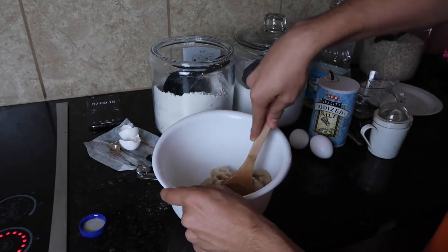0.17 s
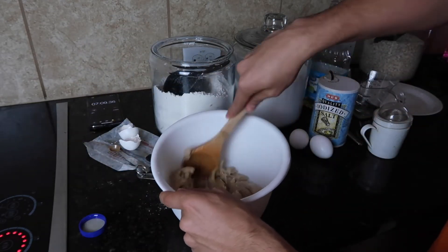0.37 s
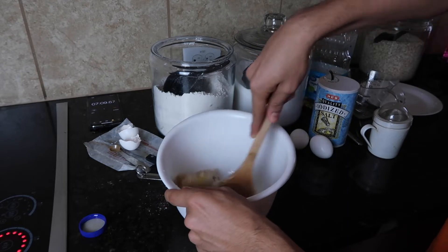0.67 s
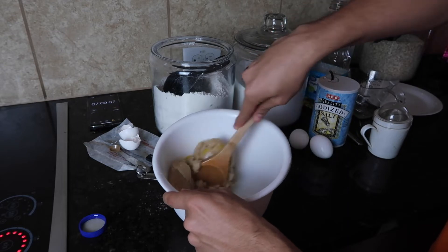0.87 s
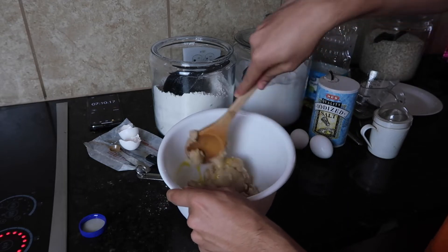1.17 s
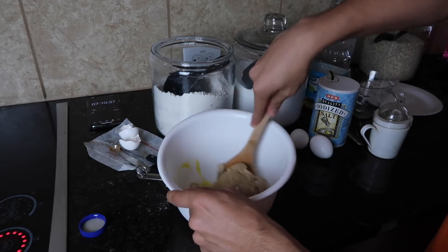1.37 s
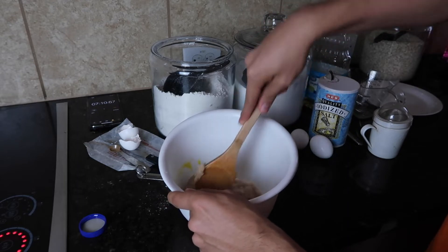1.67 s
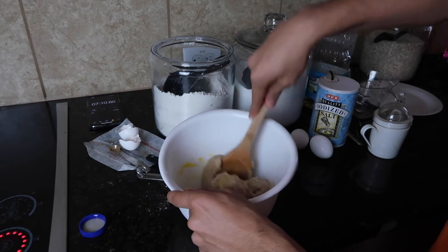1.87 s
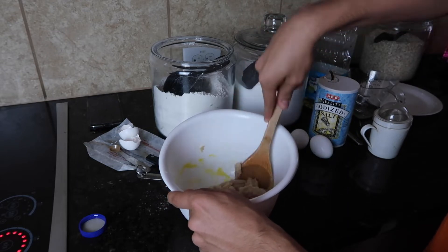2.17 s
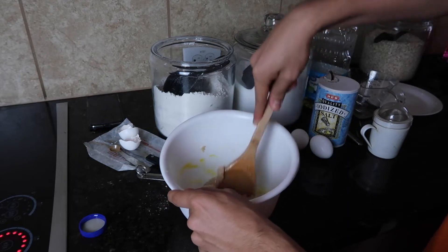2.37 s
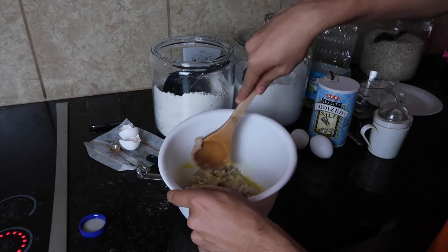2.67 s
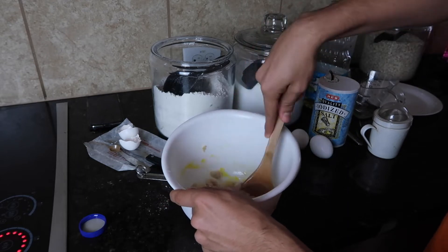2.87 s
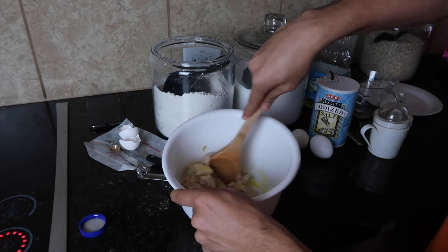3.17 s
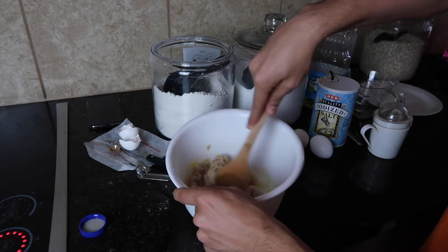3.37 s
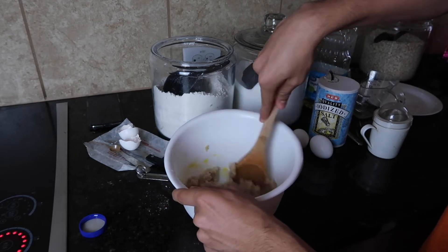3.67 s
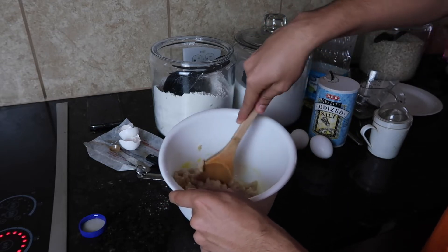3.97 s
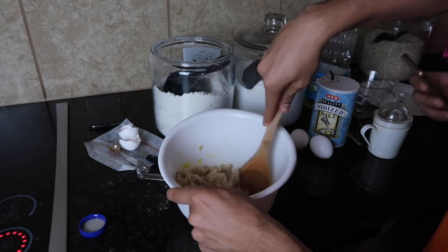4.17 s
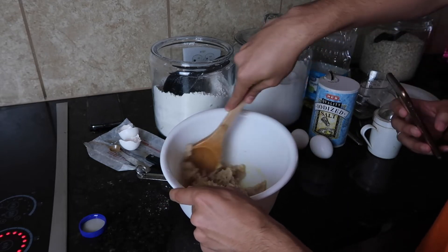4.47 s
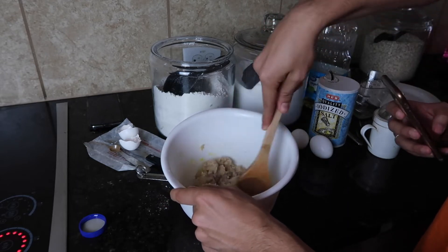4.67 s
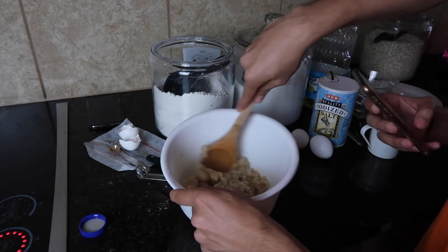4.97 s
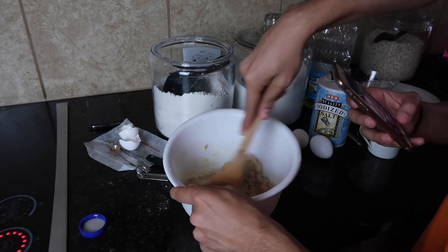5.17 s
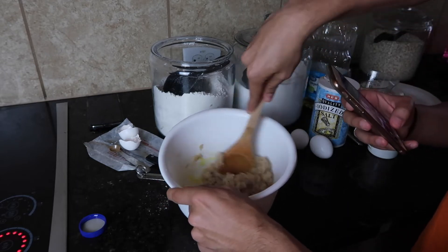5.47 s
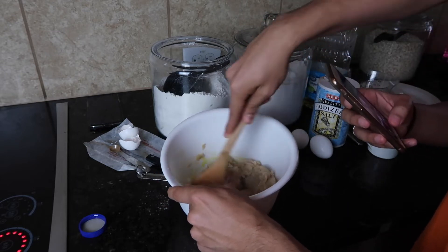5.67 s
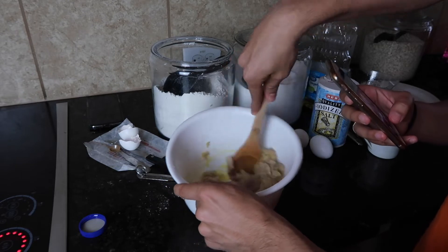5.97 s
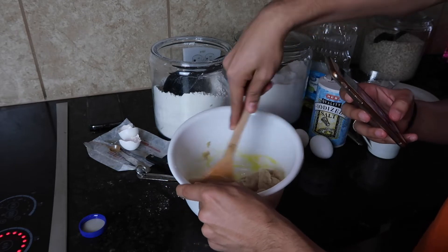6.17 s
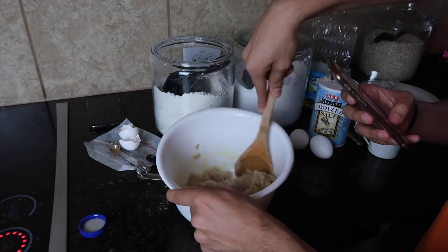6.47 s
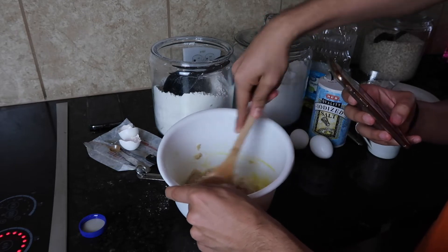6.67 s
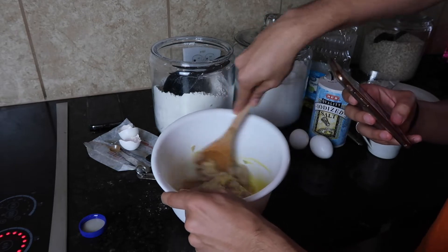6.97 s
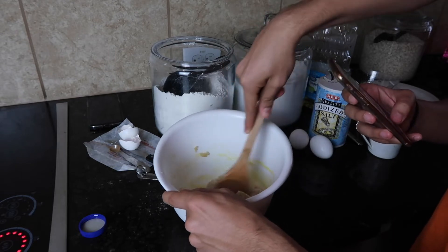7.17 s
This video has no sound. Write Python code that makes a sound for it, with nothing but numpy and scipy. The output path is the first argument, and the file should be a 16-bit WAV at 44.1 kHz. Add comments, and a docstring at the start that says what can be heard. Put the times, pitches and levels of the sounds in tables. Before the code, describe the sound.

Hot oil crackles and spits in a pan throughout, its bright pops coming in uneven clusters with fine fizz and tiny puffs of hiss. Behind it runs the low, even rumble of a fan. A wooden spoon gives a plastic mixing bowl a few short, damped knocks, the loudest near the end. Heard through a small camera microphone in a tiled kitchen, the pan sits toward the left and the bowl in the centre.

```python
"""Oil pops and sizzles in a pan to the left, over the rumble of a kitchen fan.
Each bursting bubble rings the pan and bounces off the hob and tiles; big ones thump; hiss puffs on top.
In the middle, a wooden spoon stirring dough knocks now and then on a plastic bowl.
A small camera hears it through two close microphone ports that fall out of phase in the treble."""
import sys
import numpy as np
from scipy import signal
from scipy.fft import rfft, irfft, next_fast_len
from scipy.io import wavfile
from scipy.ndimage import uniform_filter1d

SR = 44100
rng = np.random.default_rng(int(sys.argv[2]) if len(sys.argv) > 2 else 0)


def persist_wave(psi):
    """Save psi, clipped to +-1, as 16-bit WAV."""
    counts = np.round(np.clip(psi, -1, 1) * 32767).astype(np.int16)
    wavfile.write(sys.argv[1], SR, np.atleast_2d(counts).T)


N = 322371

# the louder bursting bubbles: start_s, level_db, pitch_hz
OIL_POPS = [(0.0, -12.5, 3870), (0.074, -17.5, 1540), (0.1527, -11.5, 3120), (0.1663, -3.5, 2192),
            (0.2924, -16, 3100), (0.3218, -15.5, 3720), (0.4, -12, 2250), (0.432, -19, 2100),
            (0.4593, -22, 3380), (0.476, -12, 3250), (0.5826, -20, 3340), (0.61, -12, 3600),
            (0.623, -12.5, 2720), (0.6357, -14, 3620), (0.7183, -20.5, 3200), (0.822, -3.5, 2850),
            (0.8752, -7, 2660), (0.954, -6, 3800), (1.0084, -12.5, 3170), (1.082, -5.5, 3200),
            (1.1085, -1.5, 2800), (1.1631, -1.5, 3200), (1.2156, -9, 3200), (1.2889, -9.5, 2170),
            (1.3226, -18.5, 3120), (1.3812, -14, 3300), (1.396, -7, 3200), (1.487, -4.5, 3440),
            (1.527, -5, 3380), (1.573, -13, 4330), (1.654, -12.5, 2640), (1.797, -14, 3230),
            (1.827, -15, 3950), (1.8621, -18.5, 3680), (1.9155, -13, 3830), (2.0027, -16, 3470),
            (2.117, -13.5, 2220), (2.1231, -11.5, 2850), (2.17, -17, 3450), (2.2524, -16, 3100),
            (2.266, -14, 3450), (2.293, -13.5, 2850), (2.359, -9.5, 3560), (2.399, -9.5, 3230),
            (2.4743, -7, 3050), (2.4953, -8, 2840), (2.715, -10.5, 3620), (2.7514, -16, 2830),
            (2.886, -13.5, 3550), (2.9106, -17, 3340), (2.932, -10, 2100), (2.954, -8, 2850),
            (3.055, -6.5, 3670), (3.093, -13.5, 3730), (3.1781, -8, 3440), (3.241, -21, 2800),
            (3.3413, -18, 3600), (3.353, -18, 3830), (3.379, -4, 2850), (3.4227, -3, 2630),
            (3.4784, -7, 3730), (3.498, -8, 2970), (3.523, -10, 3100), (3.5579, -11, 3130),
            (3.604, -9, 3240), (3.652, -5, 2840), (3.659, -6.5, 3170), (3.789, -14, 3600),
            (3.9288, -22, 3360), (3.955, -12.5, 2560), (3.997, -11, 3070), (4.073, -14.5, 2820),
            (4.169, -7, 3130), (4.2168, -17, 3600), (4.2796, -25, 3300), (4.298, -12.5, 2980),
            (4.347, -0.5, 2340), (4.379, -11.5, 3760), (4.54, -14, 3500), (4.574, -19, 3500),
            (4.596, -16, 3460), (4.6332, -23, 2850), (4.756, -8.5, 3200), (4.7625, -7.5, 3240),
            (4.808, -14, 2360), (4.836, -12, 3420), (4.8935, -21, 3760), (4.93, -9.5, 3050),
            (4.9679, -5.5, 3020), (5.006, -8, 3140), (5.033, -8, 2920), (5.0866, -15, 2980),
            (5.113, -9.5, 3760), (5.2351, -15, 3000), (5.2724, -4.5, 3220), (5.3356, -13.5, 3570),
            (5.353, -11, 3200), (5.3774, -14, 2440), (5.429, -15, 2670), (5.525, -9, 2630),
            (5.8168, -5, 1910), (5.8409, -2, 2610), (5.8787, -5, 2800), (5.989, -12, 3630),
            (6.0146, -12.5, 3700), (6.0367, -5, 3540), (6.0914, -7.5, 3440), (6.2252, -13, 3220),
            (6.2826, -22.5, 3400), (6.3156, -11, 2800), (6.337, -13, 3270), (6.3873, -13, 3830),
            (6.419, -11, 3400), (6.439, -6.5, 3400), (6.509, -4.5, 3600), (6.5986, -6.5, 2960),
            (6.6453, -14, 3100), (6.7564, -7.5, 2850), (6.779, -13.5, 2660), (6.7999, -4.5, 3870),
            (6.936, -1.5, 3230), (6.979, -4.5, 2450), (7.0458, -6, 3150), (7.095, -13, 4170),
            (7.1338, -10, 2960), (7.1724, -19, 2900), (7.2785, -9, 3080)]
# how hard the oil fries: time_s, level_db
FRYING_CURVE = [(0.0, -42), (0.12, -44), (0.55, -43.5), (0.63, -34), (0.81, -43.5), (1.5, -37.5),
                (1.88, -40), (2.16, -40.5), (2.3, -40), (2.86, -43.5), (2.93, -32.5), (3.34, -43.5),
                (3.501, -39), (4.14, -44.5), (4.21, -36.5), (4.68, -44), (5.12, -38), (5.87, -41.5),
                (6.43, -43.5), (7.2, -38.5), (7.31, -59)]
# resonances of the pan with its oil: pitch_hz, level_db, t60_s
PAN_MODES = [(603, 1, 0.18), (881, -0.5, 0.21), (1109, -0.5, 0.028), (1359, -16, 0.1), (1561, -7, 0.14),
             (2163, 9.5, 0.033), (2394, 13.5, 0.091), (2800, 7, 0.062), (2850, 1.5, 0.048),
             (3200, -22, 0.069), (3440, -3, 0.033), (3830, -7, 0.078)]
# tone of the fan's rumble: frequency_hz, relative_db
FAN_SPECTRUM = [(15, -40), (25, -38.5), (179, 4.5), (250, -6.5), (456, -6.5), (510, -14), (571, -5),
                (651, -11.5), (895, -9), (1160, -17.5), (1540, -10), (2200, -20), (2860, -67), (4840, -120)]
# the fan's hum: pitch_hz, level_db
FAN_HUM = [(59, -54), (80, -49), (119, -46.5), (160, -45.5), (198, -46), (446, -56)]
# direct sound and first echoes off hob and tiles: delay_ms, gain, share_from_right
HOB_ECHOES = [(0, 0.73, 0.02), (.8, 0.24, 0), (1.5, 0.32, 0), (3.15, 0.5, .2), (3.7, 0.012, .6),
              (6.0, 0.25, 0.7), (9.5, 0.023, .6)]
# decay of the room: frequency_hz, t60_s
KITCHEN_DECAY = [(300, 0.67), (2000, 0.42), (5000, 0.42), (12000, 0.018)]
# large slow bubbles: start_s, level_db, pitch_hz
BIG_BUBBLES = [(.168, -1.5, 1510), (1.174, -2, 1400), (2.4955, -4.5, 1165), (2.955, -2, 954),
               (4.044, -8, 1480), (4.7639, 1.5, 1160), (6.647, -11, 1510)]
# spits of oil and, above 11 kHz, brief, very high puffs of hiss: start_s, level_db, centre_hz
HISS_PUFFS = [(0.338, -33.5, 8400), (0.374, -35, 10300), (0.458, -36, 6560), (0.846, -34, 8950),
              (0.985, -32.5, 4900), (1.148, -34, 6000), (1.493, -30.5, 10600), (1.567, -47, 5400),
              (1.798, -37.5, 11100), (1.967, -31.5, 5900), (2.347, -29.5, 6500), (2.585, -36.5, 5740),
              (3.029, -38, 5140), (3.236, -36, 7100), (3.313, -30, 11300), (3.55, -35.5, 5500),
              (3.5953, -35.5, 5300), (4.278, -37, 5700), (4.509, -39, 6000), (4.802, -36, 6200),
              (5.1, -33.5, 9000), (5.538, -32, 5900), (6.08, -27.5, 11200), (6.364, -32, 5200),
              (6.392, -38, 5030), (6.757, -32.5, 9800), (6.903, -35.5, 8850), (7.153, -36.5, 9100)]
# spoon on bowl, retuned as dough weighs on its wall:
# start_s, level_db, hardness_hz, thud_relative_db, pitch_ratio
SPOON_KNOCKS = [(1.408, -29, 900, 12.5, 0.91), (1.4135, -27.5, 2200, -14, 0.93),
                (2.078, -23.5, 2000, -26, 1.04), (4.715, -40, 1000, -9, 0.96),
                (5.186, -14.5, 2500, 0, 1.037), (5.721, -31, 1800, 1, 0.74), (6.2354, -11, 2800, -14, 0.96),
                (6.563, -29.5, 2500, -23, 1)]
# resonances of the bowl, damped by dough and hand: pitch_hz, level_db, t60_s
BOWL_MODES = [(572, -9.5, 0.021), (708, 3, 0.022), (1180, -8.5, 0.016), (1750, -2.5, 0.02),
              (2080, -8.5, 0.03), (2170, -2, 0.02), (2540, -5.5, 0.012)]
# how far the left port leads the right for the pan: frequency_hz, phase_rad
LEFT_LEAD = [(1000, 0), (2240, .2), (2930, .6), (3530, .6), (4130, 1.6), (5250, 1.8), (6290, 2.2),
             (8010, 2.7), (15200, 2.75)]
# how much louder the pan is in the left port: frequency_hz, level_db
LEFT_BOOST = [(300, 1), (1500, 2.5), (3300, 3.5), (5500, 2), (9000, 0)]
# likeness of the two ports for sound from all around: frequency_hz, correlation
PORT_LIKENESS = [(60, .995), (200, .997), (450, .94), (1600, .8), (3300, .4), (5500, -.2), (9000, -.85)]
# the microphone's colour: frequency_hz, gain_db
MIC_EQ = [(1000, -1), (2200, -5.5), (3000, 5), (4200, 1), (5500, -4.5), (8000, -3.5), (11500, -18),
          (13500, -14.5), (15500, -40)]


def gain_of(db):
    """dB to amplitude."""
    return 10 ** (np.asarray(db) / 20)


def unit_rms(x):
    """Scales to rms 1."""
    return x / np.sqrt(np.mean(x ** 2) + 1e-20)


def curve_at(points, hz):
    """Joins (Hz, value) points on a log-frequency axis."""
    f, value = np.transpose(points)
    return np.interp(np.log(hz + 1), np.log(f + 1), value)


def add(mix, start_s, sound):
    """Drops a sound into the mix."""
    part = mix[round(start_s * SR):][:len(sound)]
    part += sound[:len(part)]


def wander(samples, shape=N):
    """Slow random modulation of rms 1, smoothed over so many samples."""
    return unit_rms(uniform_filter1d(uniform_filter1d(rng.standard_normal(shape), samples), samples))


def sparks(per_s, spread_db):
    """Randomly timed impulses, most small and a few large."""
    return gain_of(spread_db * np.minimum(rng.exponential(1, N), 4)) * (rng.random(N) < per_s / SR)


def ring(x, modes, length_s=1 / 3):
    """Plays a sound through a body whose modes are dying sines."""
    t = np.arange(0, length_s, 1 / SR)
    body = sum(gain_of(db - 60 * t / t60) * np.sin(2 * np.pi * hz * t) for hz, db, t60 in modes)
    return signal.oaconvolve(x, body)[:N]


def diffuse(spectra, hz):
    """Blends two noise spectra into a stereo pair that comes from all around."""
    likeness = np.clip(curve_at(PORT_LIKENESS, hz), -1, 1)[:, None]
    return np.array([spectra[0], likeness * spectra[0] + np.sqrt(1 - likeness ** 2) * spectra[1]])


def bubble(hz, cycles, rise):
    """A blip with a fast attack; a positive rise bends it upward, as when a bubble opens."""
    t = np.arange(int(5 * cycles / hz * SR)) / SR
    age = t * hz / cycles
    envelope = (1 - np.exp(-12 * age)) * np.exp(-1.3 * age)
    return envelope * np.sin(2 * np.pi * hz * t * (1 + rise * age))


def pops():
    """Each pop is one bursting bubble, a dull tick and a ragged sputter of smaller bubbles."""
    out = np.zeros(N)
    sputter_s, scatter_octaves = .014, .34
    for (start_s, db, hz), (late, tone, soft, length) in zip(OIL_POPS, rng.random((len(OIL_POPS), 4, 12))):
        pop = np.zeros(2048)
        head = bubble(hz, cycles=2.6 + 1.9 * length[0], rise=0.0043)
        tick = bubble(hz * 0.73, cycles=2.1, rise=0.017)
        add(pop, .0006, gain_of(-10 - 1.7 * soft[0]) * head)
        add(pop, .0006, gain_of(-13 - 13 * soft[1]) * tick)
        for k in range(len(late)):
            pitch_hz = hz * 2 ** (scatter_octaves * (tone[k] - .5))
            small = bubble(pitch_hz, cycles=3 + 7 * length[k] ** 2, rise=.06 * length[-k])
            delay_s = 0.000993 + sputter_s * (.5 + soft[2]) * late[k] ** 1.4
            add(pop, delay_s, gain_of(-9.5 - 10 * soft[k] - 6.8 * late[k]) * small)
        add(out, start_s, gain_of(db + 12) * pop / np.linalg.norm(pop))
    return out


def pop_flare(tail_s):
    """An envelope that leaps with each pop and dies away."""
    kicks = np.zeros(N)
    for start_s, db, _ in OIL_POPS:
        add(kicks, start_s, gain_of([db]) ** 2)
    return np.sqrt(signal.lfilter([1], [1, -np.exp(-1 / (tail_s * SR))], kicks))


def frying_db():
    """The swell and ebb of the frying, sample by sample."""
    return np.interp(np.arange(N) / SR, *np.transpose(FRYING_CURVE))


def fizz():
    """A bed of small bubbles bursting in clumps; it flares with every pop."""
    clumps = gain_of(3.5 * wander(500))
    bursts = sparks(per_s=1200 * clumps, spread_db=4.5)
    voice = rng.integers(0, 20, N)
    bed = sum(signal.oaconvolve(bursts * (voice == k), bubble(hz, cycles=3.38, rise=0.208))[:N]
              for k, hz in enumerate(np.geomspace(1800, 6500, num=20)))
    level = gain_of(frying_db()) + gain_of(-24) * pop_flare(tail_s=0.0062)
    return unit_rms(bed) * level


def pan(x):
    """The pan rings behind the direct sound."""
    return x + gain_of(-51) * ring(x, PAN_MODES)


def steam():
    """Fine crackling hiss that half follows the frying and flares with each pop; each band flickers."""
    level = gain_of(frying_db() * 0.61 - 13.5) + gain_of(-20.5) * pop_flare(tail_s=0.0022)
    snap_envelope = signal.lfilter([1], [1, -.97], sparks(per_s=600, spread_db=4))
    crackle = gain_of(-3) * unit_rms(snap_envelope * rng.standard_normal(N))
    hiss, edges_hz = np.zeros(N), (4800, 6500, 9000, 12000, 16000)
    for band in zip(edges_hz, edges_hz[1:]):
        flicker = gain_of(10 * wander(800))
        bandpass = signal.butter(2, band, "band", fs=SR, output="sos")
        hiss += flicker * signal.sosfilt(bandpass, rng.standard_normal(N) + crackle)
    return unit_rms(hiss) * level


def fan():
    """A wide rumble under a hum that wavers in level and pitch."""
    frames, hz = N // 512 + 5, np.fft.rfftfreq(2048, 1 / SR)
    real, imag = rng.standard_normal((2, 2, frames, len(hz))).transpose(0, 1, 3, 2)
    spectra = diffuse(real + 1j * imag, hz) * gain_of(curve_at(FAN_SPECTRUM, hz))[:, None]
    rumble = signal.istft(spectra, nperseg=2048, noverlap=1536)[1][:, :N]
    out = gain_of(-34.5) * unit_rms(rumble)
    t = np.arange(N) / SR
    for pitch_hz, db in FAN_HUM:
        swell, drift = wander(1500, shape=(2, N))
        turns = pitch_hz * t + np.cumsum(3.905 * drift) / SR
        out += gain_of(db + 4 + 3.37 * swell) * np.sin(2 * np.pi * turns)
    return out


def from_left(x):
    """The left port leads in phase, more so in the treble, and is louder in the mids."""
    size = next_fast_len(N + 4096)
    hz = np.fft.rfftfreq(size, 1 / SR)
    half_step = gain_of(curve_at(LEFT_BOOST, hz) / 2) * np.exp(.5j * curve_at(LEFT_LEAD, hz))
    return irfft(rfft(x, size) * np.array([half_step, 1 / half_step]), size)[:, :N]


def hob(x):
    """The hob and tiles slap the sound back within milliseconds, partly from the other side."""
    taps = np.zeros((2, 512))
    for delay_ms, gain, right in HOB_ECHOES:
        taps[:, round(delay_ms * SR / 1000)] += gain * np.array([1 - right, right])
    near, far = (from_left(signal.oaconvolve(x, side)[:N]) for side in taps)
    return near + far[::-1]  # swapping channels puts the far echoes on the right


def kitchen(x):
    """The room's diffuse tail, each band dying at its own speed."""
    hz, t, noise = signal.stft(rng.standard_normal((2, SR // 2)), SR, nperseg=256)
    bloom = 1 - np.exp(-t / 0.008)
    decay = gain_of(-60 * t / curve_at(KITCHEN_DECAY, hz)[:, None])
    tail = signal.istft(diffuse(noise, hz) * bloom * decay, SR, nperseg=256)[1]
    return signal.fftconvolve(x[None], tail / np.linalg.norm(tail[0]), axes=1)[:, :N]


def thumps():
    """A large bubble pushes the pan's floor; the low modes nearest its pitch ring on."""
    out, falloff_db_per_octave = np.zeros(N), 10
    for start_s, db, hz in BIG_BUBBLES:
        push = np.gradient(bubble(hz, cycles=0.99, rise=0.077)) * SR / (2 * np.pi * hz)
        soften = np.hanning(int(SR / hz / 3) + 2)
        push = gain_of(db) * np.convolve(push, soften / soften.sum())
        modes = [(f, level - falloff_db_per_octave * abs(np.log2(f / hz)), t60)
                 for f, level, t60 in PAN_MODES[:6]]
        add(out, start_s, push)
        add(out, start_s, gain_of(-30.5) * ring(push, modes))
    return out


def hiss_puffs():
    """Brief, bright puffs of hiss, each a band of noise with a sharp attack and a short tail."""
    out, t = np.zeros(N), np.arange(2048) / SR
    hz = np.fft.rfftfreq(len(t), 1 / SR)
    low_cut = np.minimum(hz / 4500, 1) ** 3
    envelope = (1 - np.exp(-t / 0.00022)) * (np.exp(-t / 0.018) + 2.27 * np.exp(-t / 0.013))
    for (start_s, db, centre_hz), noise in zip(HISS_PUFFS, rng.standard_normal((len(HISS_PUFFS), len(t)))):
        colour = low_cut / (1 + (np.log2((hz + 1) / centre_hz) / 0.29) ** 2)
        add(out, start_s, gain_of(db) * unit_rms(irfft(rfft(noise) * colour)) * envelope)
    return out


def knocks():
    """The spoon strikes, bounces and sets the bowl ringing; the bowl's foot thuds on the counter."""
    out, chances = np.zeros(N), rng.random((len(SPOON_KNOCKS), 2, 5))
    for (start_s, db, hardness_hz, thud_db, ratio), bounces in zip(SPOON_KNOCKS, chances):
        blow = np.diff(np.hanning(int(SR / hardness_hz) + 3))  # shorter contact, brighter click
        blow *= gain_of(db + 5) / blow.max()
        chatter = np.zeros(1024)
        add(chatter, 0, blow)
        for late, soft in bounces.T:
            add(chatter, 0.00069 + 0.00617 * late, gain_of(-18 * soft - 4.3 * late) * blow)
        modes = [(hz * ratio, level, t60) for hz, level, t60 in BOWL_MODES]
        thud = bubble(hz=289.5, cycles=4.3, rise=-0.016)
        add(out, start_s, .6 * chatter)
        add(out, start_s, gain_of(-18) * ring(chatter, modes, length_s=1 / 20))
        add(out, start_s + 0.0022, gain_of(db + thud_db) * thud)
    return out


def scene():
    """Pan on the left, bowl in the middle, fan and room all around."""
    oil = pan(pops() + fizz()) + thumps()
    hiss = hiss_puffs() + steam()
    spoon = knocks()
    room = gain_of(-12.5) * kitchen(oil + hiss) + gain_of(-13.5) * kitchen(spoon)
    return hob(oil) + from_left(hiss) + spoon + room + fan()


def record(dry):
    """The microphone's colour, then a steep high cut."""
    hz = np.linspace(0, SR / 2, 513)
    colour = signal.firwin2(255, hz, gain_of(curve_at(MIC_EQ, hz)), fs=SR)
    high_cut = signal.firwin(511, cutoff=15700, window=("kaiser", 9), fs=SR)
    return signal.oaconvolve(dry, np.convolve(colour, high_cut)[None], "same", axes=1)


dry = scene()
out = record(dry)
persist_wave(out)
```